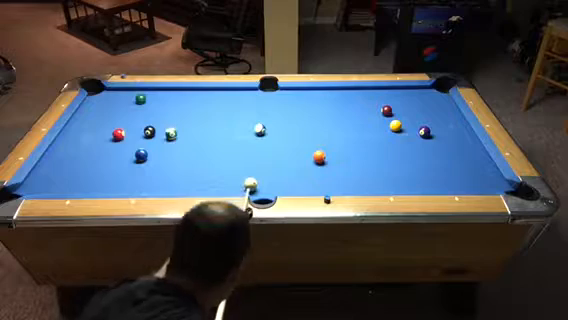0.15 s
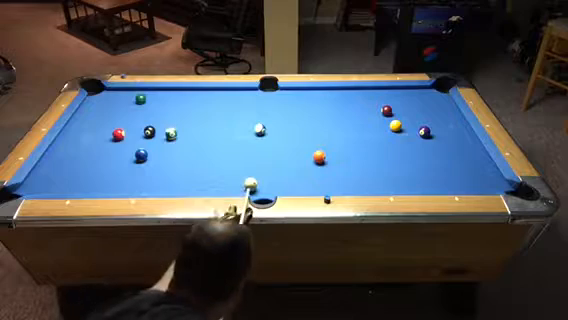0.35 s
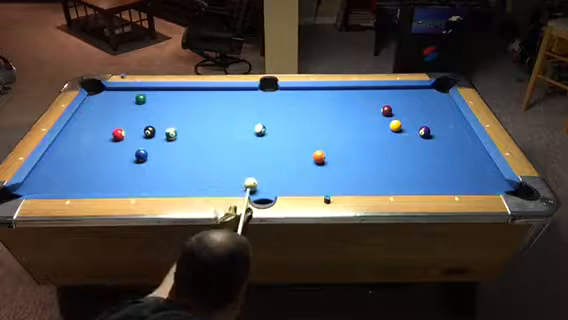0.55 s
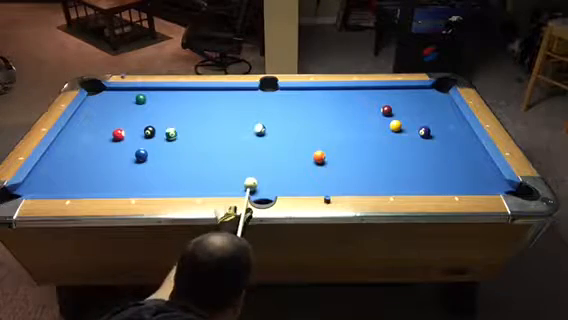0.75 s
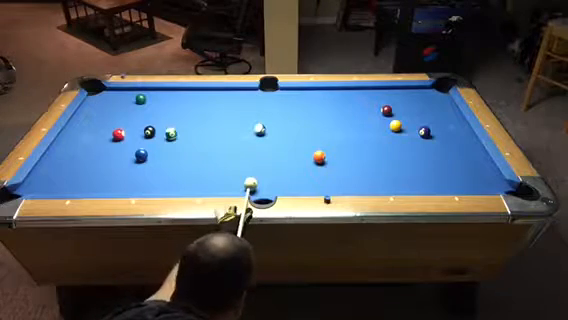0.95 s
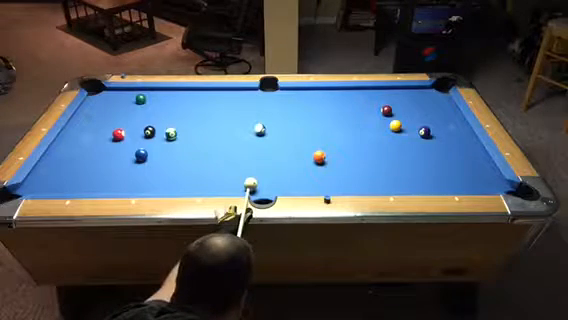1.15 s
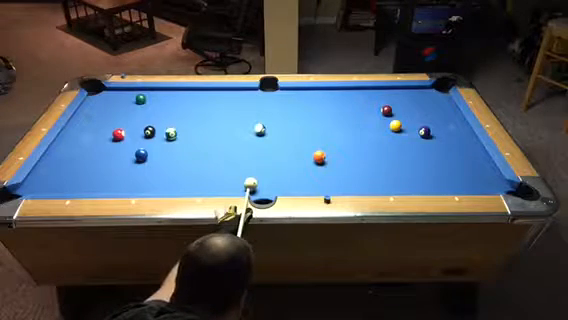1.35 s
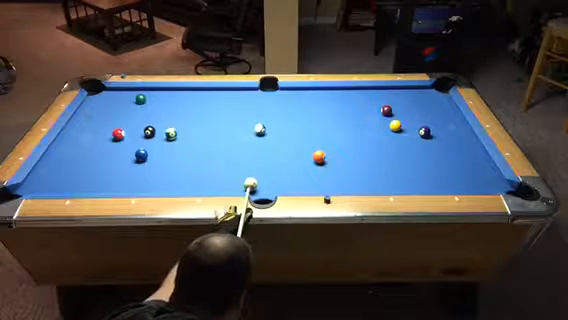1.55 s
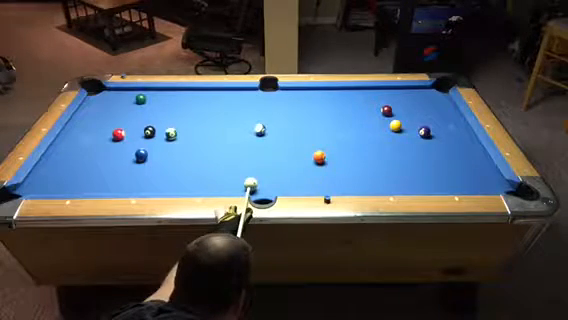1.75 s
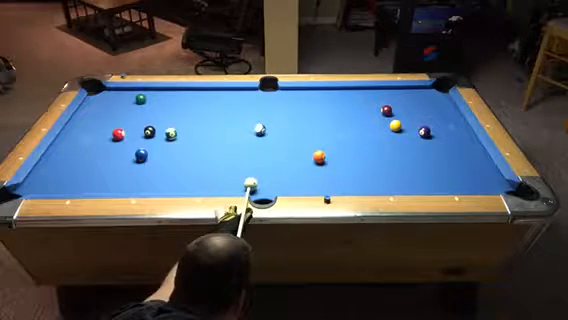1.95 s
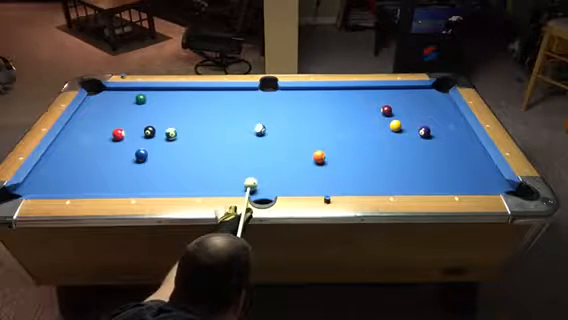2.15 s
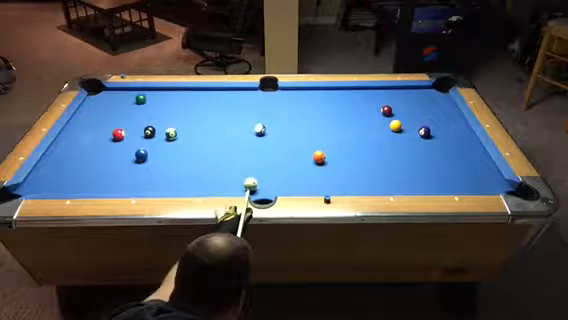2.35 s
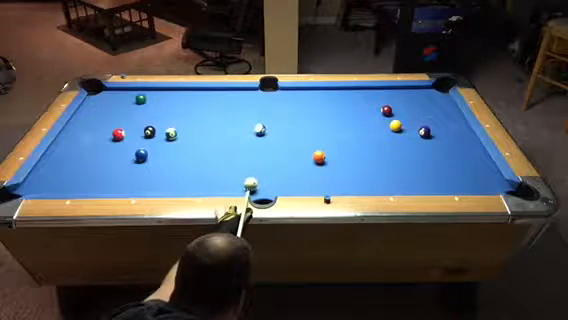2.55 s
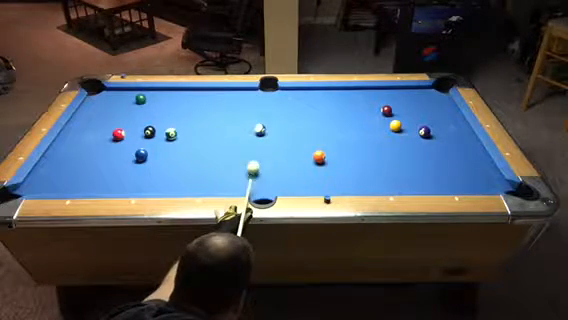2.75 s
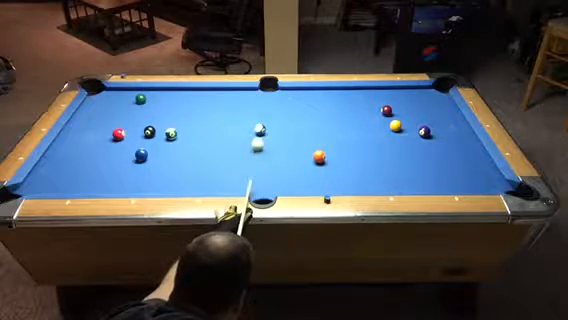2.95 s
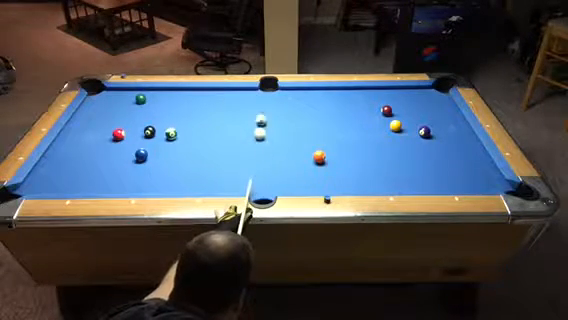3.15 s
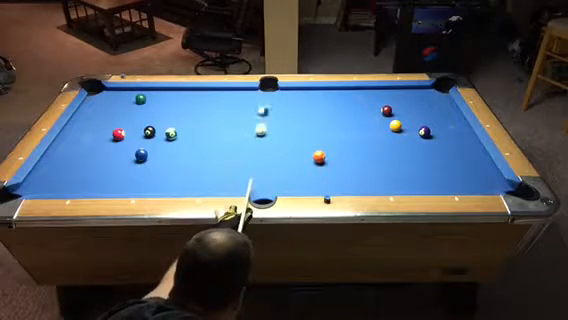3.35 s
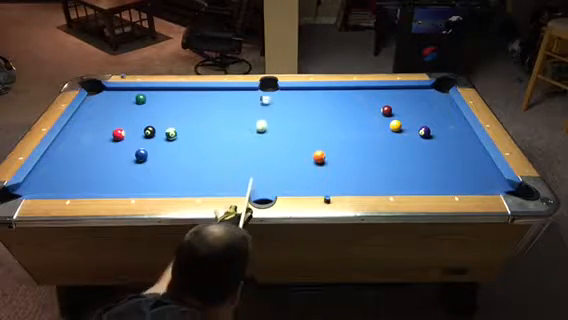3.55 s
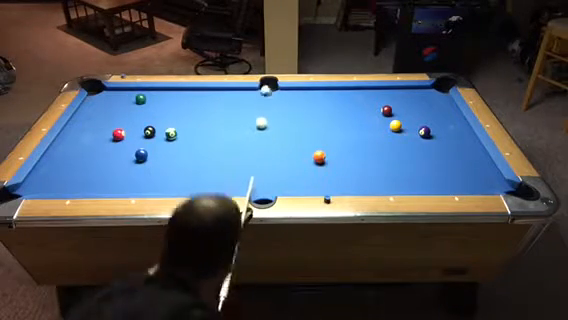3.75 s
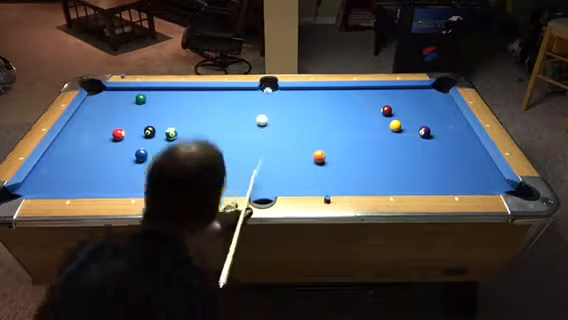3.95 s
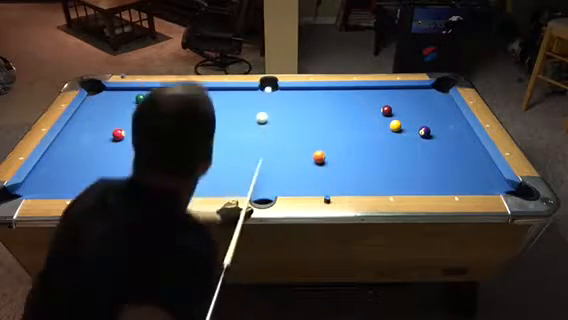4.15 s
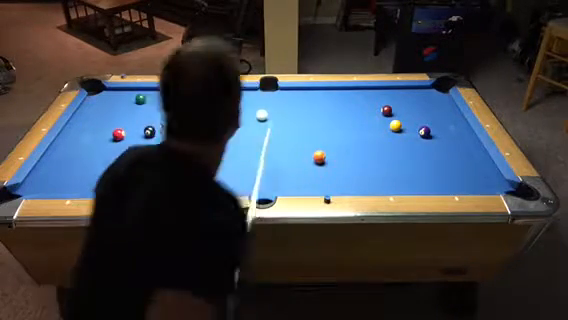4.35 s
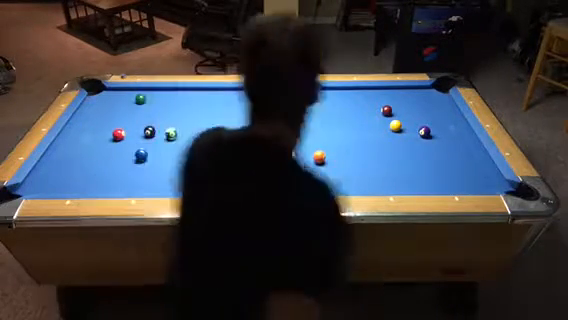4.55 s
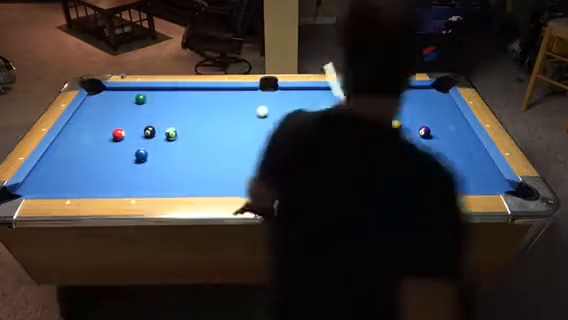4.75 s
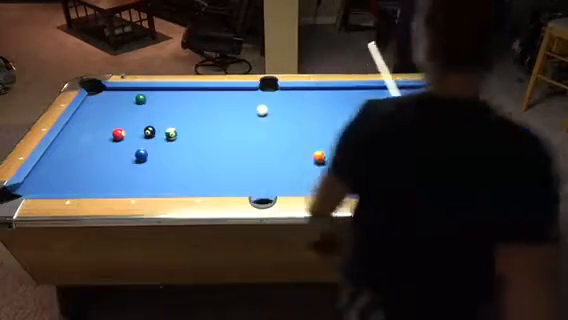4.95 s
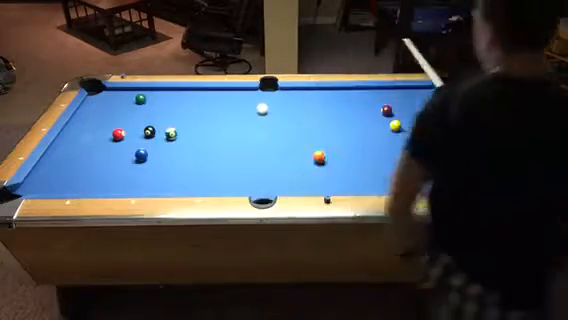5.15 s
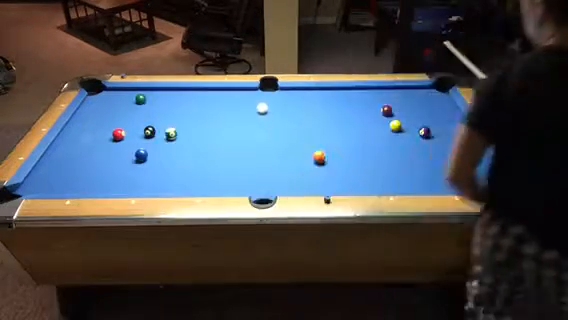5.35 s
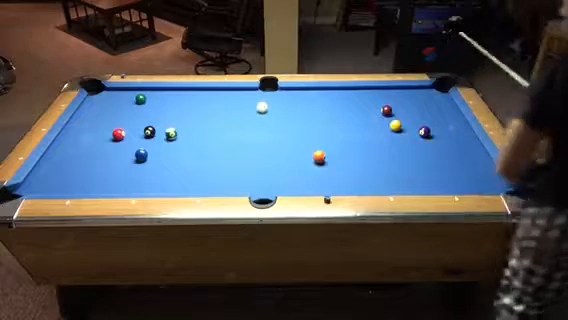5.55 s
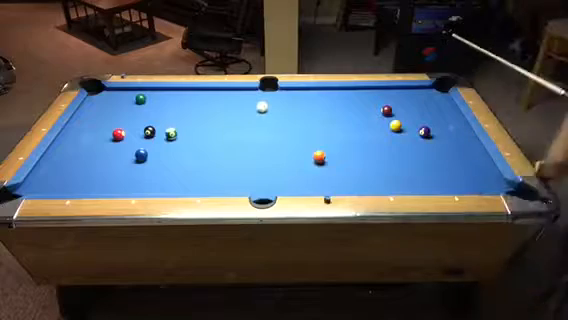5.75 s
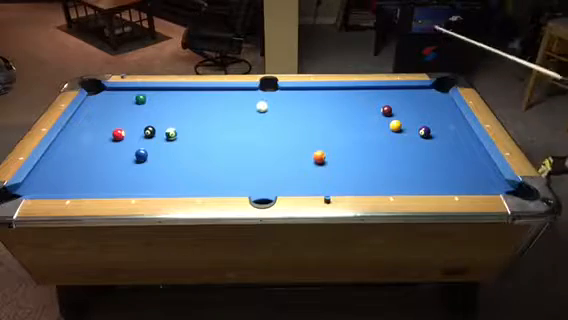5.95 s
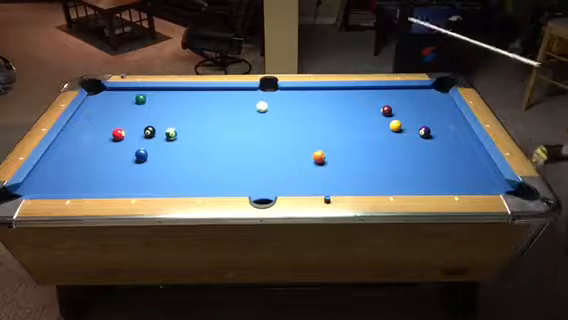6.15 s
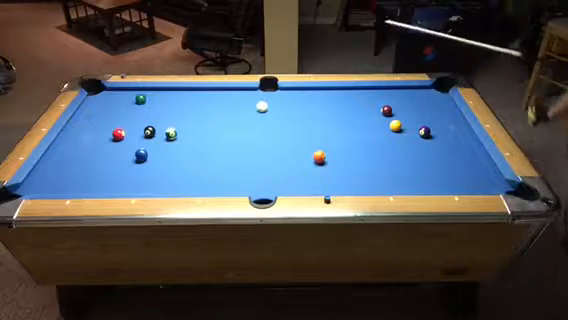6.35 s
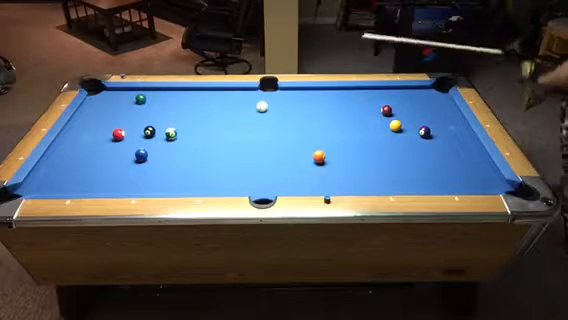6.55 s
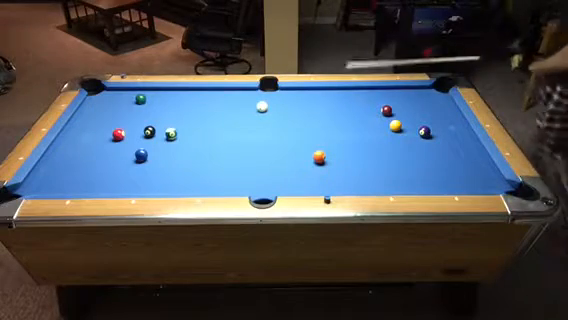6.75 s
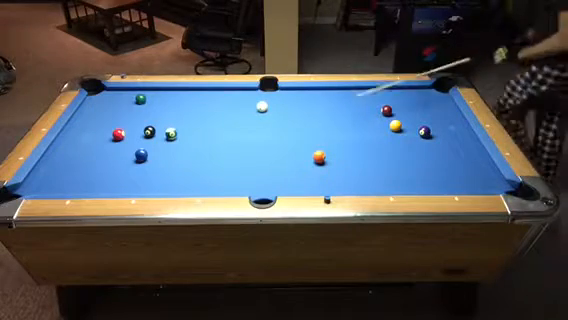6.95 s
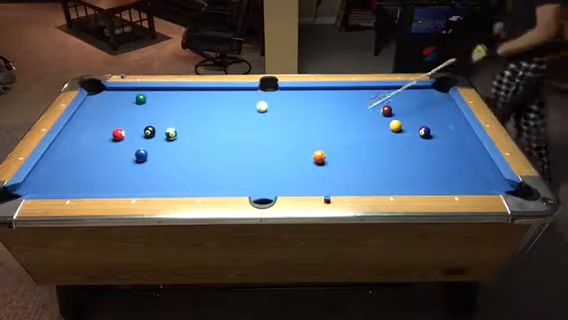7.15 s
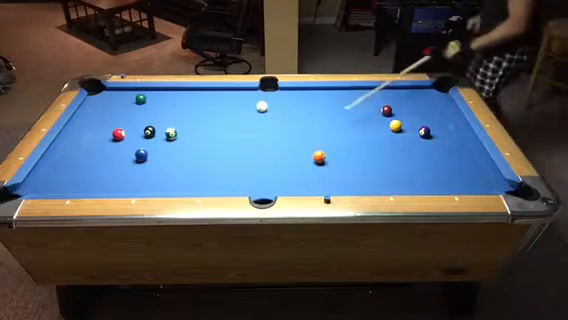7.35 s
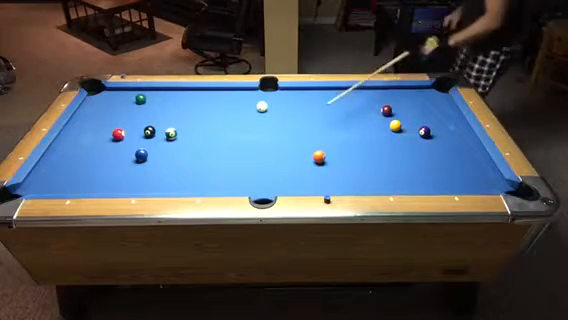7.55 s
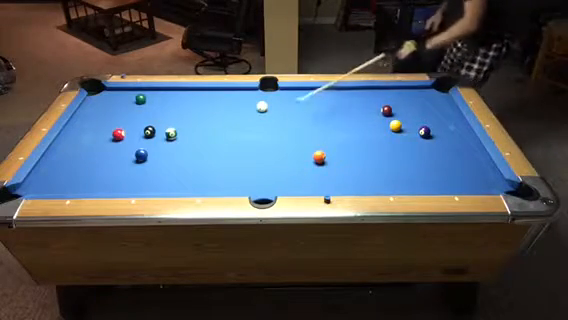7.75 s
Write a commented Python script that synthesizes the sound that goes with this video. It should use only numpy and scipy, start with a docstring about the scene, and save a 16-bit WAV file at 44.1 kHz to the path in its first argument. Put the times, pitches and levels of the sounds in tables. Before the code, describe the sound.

Pool balls click, drop into pockets and knock and rumble down a hollow wooden ball return in a small room.

```python
"""Pool balls click, drop into pockets, then knock and rumble down the table's wooden ball return.
Each blow is a bare contact crack plus a noisy ring that is coloured by the hollow cabinet and dies
fast in a small carpeted basement. Some knocks leave a panel ringing, and the channel hums under the
rolling balls. Behind the table, shoes scuff over faint ventilation hum and hiss."""
import sys
import numpy as np
from scipy import signal
from scipy.fft import rfft, irfft
from scipy.io import wavfile
from scipy.ndimage import uniform_filter1d

SR = 44100
rng = np.random.default_rng(int(sys.argv[2]) if len(sys.argv) > 2 else 0)


def file_out(sig):
    """Save sig as 16-bit WAV at sys.argv[1]."""
    # one column per channel
    cols = np.atleast_2d(sig).T
    # limit, then scale
    lim = np.clip(cols, -1, 1)
    pcm = np.round(lim * 32767).astype(np.int16)
    wavfile.write(sys.argv[1], SR, pcm)


N = 347949

BANDS_HZ = 35 * 2 ** np.arange(0, 9, 1 / 3)  # third-octave centres
# resonances of the hollow cabinet: (pitch [Hz], lift over the wood's broad ring [dB])
CABINET_MODES = [(71, 3), (245, 4.5), (322, 0.5), (357, 4.5), (440, 3), (495, 3), (539, 2), (600, 2),
                 (850, 4.5), (969, 3), (1081, 4), (1272, -1), (1395, 0), (1697, 3), (1780, 0.5), (2145, 3),
                 (2424, -8.5)]
# balls rolling down the return: (time [s], rumble [dB], channel pitch [Hz], channel hum [dB])
ROLL_PATH = [(0, -48, 348.4, -59), (.6, -38, 325.6, -40.5), (.88, -62.5, 238.4, -55.5),
             (1.5, -47.5, 240.7, -62), (1.9, -30, 295, -36), (2.36, -34.5, 289.3, -36.5),
             (2.41, -31, 209.3, -36.5), (2.55, -34.5, 201.7, -34), (2.68, -38, 378, -41),
             (2.97, -54, 300, -57), (3.6, -78, 277, -80.5), (4.0, -56.5, 262.8, -68),
             (4.5, -41.5, 296.5, -54.5), (4.9, -31.5, 240.7, -42), (5.25, -38, 341.6, -54.5),
             (5.85, -37, 362.5, -40), (6.45, -34.5, 301.5, -51), (6.8, -29.5, 301.2, -44),
             (7.05, -79, 258.4, -75), (7.42, -55.5, 249.6, -56.5), (7.47, -58, 344, -55.5),
             (7.89, -45.5, 344.3, -51.5)]


def blows(bands, gain_db=-11, crack_db=16, place_db=6, linger=1.254, early_db=6, early_s=0.0042):
    """Each blow cracks, then wood ring and room echoes gather and die away band by band."""
    # decay of wood and room: (frequency [Hz], nominal ring time [s])
    ring_times = [(50, 0.34), (100, 0.36), (200, 0.3), (400, 0.24), (1000, 0.2), (2500, 0.19), (6000, 0.17),
                  (12000, 0.076)]
    # how fast the echoes gather: (frequency [Hz], rise time [s])
    rise_times = [(60, 0.024), (300, 0.0046), (2000, 0.0043), (10000, 0.0033)]
    # the crack and its returns from slate, floor, ceiling and wall: (delay [s], level [dB])
    echoes = [(.0012, 0), (.002, -4), (.0128, -9), (.0178, -10), (.024, -11)]
    t = np.arange(2 ** 15, dtype=np.float32) / SR
    times, levels, bare_db, stretch = contacts()
    levels = gain_db + levels
    gather = 1 - np.exp(-t / along(rise_times, BANDS_HZ)[:, None])
    gather *= 1 + undb(early_db) * np.exp(-t / early_s)  # the first reflections are the strongest
    # the ball jostles on after the blow, so the fall starts slowly and steepens
    fall = np.log(1000) / 2 * (2 * t / along(ring_times, BANDS_HZ)[:, None]) ** linger
    noise_starts = rng.integers(0, N - len(t), len(times))
    places = place_db * np.tanh(rng.standard_normal((len(times), len(CABINET_MODES))) / 1.5)
    places[:, 0] = 0  # the deepest mode is the whole box and answers anywhere
    scatter = (np.arange(24) + rng.random((len(times), 24))) / 24
    spot_hz = np.interp(scatter, (0, 1), (1100, 5400))  # small modes of each struck spot
    out = np.zeros(N + len(t))
    for k, start in enumerate(noise_starts):
        tail = bands[:, start:start + len(t)] * gather * np.exp(-fall / stretch[k])
        i = int(times[k] * SR)
        out[i:i + len(t)] += cabinet(undb(levels[:, k]) @ tail, places[k], spot_hz[k])
        pulse = undb(crack_db + bare_db[k]) * crack(levels[:, k])
        for delay, db in echoes:
            j = i + int(delay * SR)
            out[j:j + len(pulse)] += undb(db) * pulse
    return out[:N]


def contacts():
    """Time, band levels, crack level and ring stretch of every knock, click and thump."""
    return [np.hstack(column) for column in zip(knocks(), clicks(), thumps())]


def knocks():
    """Balls hit the wood of pocket and return; harder contact is brighter and cracks more."""
    # ball on wood: (time [s], level [dB], relative boom [dB], hardness [dB], ring stretch [x])
    hits = [(0.296, -39.5, -15, -17, 3.7), (0.391, -21, -7, -6, 2.7), (0.475, -19, 1, 1.5, 1.67),
            (0.546, -15, -12.5, -27, 1.49), (1.07, -28.5, 13, 4.5, 1.38), (1.282, -39.5, 11.5, -5, 0.74),
            (1.57, -30, 9.5, -19, 4), (1.664, -14, -20.5, -3, 1.87), (1.714, -18.5, -10, 1, 0.88),
            (1.761, -19.5, -7, -4.5, 1.35), (1.814, -21.5, 4, -0.5, 0.97), (1.858, -21.5, -4.5, -4, 2.86),
            (2.027, -22, -3.5, -0.5, 1.2), (2.086, -25, -6.5, -3.5, 4.2), (2.515, -23, 3, -62, 0.88),
            (2.574, -20.5, -12.5, 7, 1.76), (2.641, -18, -8.5, -7, 1.77), (2.754, -18.5, -6.5, 3.5, 1.45),
            (3.208, -23, -11, 3.5, 2.56), (3.356, -25.5, -44.5, -5, 1.9), (3.872, -35, -14.5, -23, 1.26),
            (4.077, -16, 4, 8, 1.58), (4.227, -19, 1.5, 6, 1.36), (4.31, -22.5, 0, 3.5, 1.8),
            (4.425, -37.5, 9.5, 1, 8.4), (4.663, -17.5, -1, 2, 1.83), (5.278, -15, -3, 3.5, 0.86),
            (5.304, -11.5, -0.5, 2, 1.15), (5.39, -20, 2, 5.5, 1.68), (5.548, -20, -3.5, -1, 1.79),
            (5.675, -24, -4.5, -3, 2.54), (6.498, -19.5, -2, -11, 4.3), (6.529, -21, -18, 4.5, 3.2),
            (6.64, -27.5, -7, -10, 3.7), (7.203, -35.5, 2, -9, 1.42), (7.452, -35.5, -15, -28.5, 0.57)]
    times, db, boom, hardness, stretch = np.transpose(hits)
    centres_hz = [70, 330, 1100, 2500, 6500]  # boom, knock, clack, click, snap
    colour_db = [boom, np.zeros_like(db), -9 + .5 * hardness, -21.5 + .9 * hardness, -37.5 + 2.6 * hardness]
    levels = db + tilt(centres_hz, colour_db, below_db_oct=-19.5, above_db_oct=-24)
    return times, levels, -6.5 + .23 * hardness, stretch


def clicks(below_db_oct=-2.5, above_db_oct=-53.5, floor_db=-58):
    """Cue tip and balls click together: bright up to a pitch, with a steep drop above it."""
    # hard contacts: (time [s], level [dB], pitch [Hz], bare crack [dB], ring stretch [x])
    hits = [(1.758, -36.5, 2820, -6, 0.22), (1.813, -34.5, 3030, -3, 0.21), (1.856, -37.5, 3040, -8, 0.2),
            (1.887, -37.5, 2520, 0, 0.59), (2.573, -33.5, 2600, 14.5, 0.22), (2.58, -43, 12000, -11, 2.3),
            (3.112, -34.5, 2690, -19, 4.2), (3.159, -24, 3050, 15.5, 1.34), (4.075, -33, 4640, 20.5, 0.39),
            (4.229, -37, 4260, 14, 0.31), (4.31, -44.5, 4370, 14.5, 0.44), (6.112, -43.5, 3100, -6, 0.86),
            (6.523, -41.5, 10400, -10, 1.2), (6.499, -29.5, 2580, 9, 2.25), (6.639, -29.5, 2520, -19, 3.32)]
    times, db, hz, bare_db, stretch = np.transpose(hits)
    octaves = np.log2(BANDS_HZ[:, None] / hz)
    body = below_db_oct * np.maximum(-octaves, 0)
    top = np.maximum(above_db_oct * np.maximum(octaves, 0), floor_db + bare_db)  # a crack lifts the floor
    return times, db + body + top, bare_db, stretch


def thumps():
    """Deep thumps shake the box as a whole, with hardly any crack."""
    # low blows: (time [s], level [dB], ring stretch [x])
    hits = [(0.887, -15, 0.98), (0.982, -15, 0.59)]
    times, db, stretch = np.transpose(hits)
    levels = db + tilt([70], [np.zeros_like(db)], below_db_oct=-19.5, above_db_oct=-14.5)
    return times, levels, np.full(len(times), -40), stretch


def crack(band_db, size=256, low_cut_hz=720):
    """The bare contact: a pulse a few cycles long, in the blow's colour but thin in the bass."""
    hz = np.maximum(np.fft.rfftfreq(size, 1 / SR), 50)
    gain = undb(along(np.transpose([BANDS_HZ, band_db]), hz)) / np.sqrt(1 + (low_cut_hz / hz) ** 4)
    cepstrum = irfft(np.log(gain))
    cepstrum[1:size // 2] *= 2  # minimum phase packs the energy at the front
    cepstrum[size // 2 + 1:] = 0
    pulse = irfft(np.exp(rfft(cepstrum)))
    return pulse / np.abs(pulse).max() * undb(band_db[BANDS_HZ > 600].max())


def cabinet(shake, place_db, spot_hz=(), spot_db=8.5, wood_loss=0.005, rail_loss=0.072):
    """Box and rails lift their modes out of whatever shakes them; the place struck favours some."""
    f = np.fft.rfftfreq(len(shake), 1 / SR)[:len(shake) // 8]
    spectrum = rfft(shake)
    # (pitch [Hz], lift [dB], width [Hz])
    box = [(hz, db + place, 8 + wood_loss * hz) for (hz, db), place in zip(CABINET_MODES, place_db)]
    spot = [(hz, spot_db, 30) for hz in spot_hz]
    rails = [(hz, 2.4, rail_loss * hz) for hz in (1300, 2200)]
    for hz, db, width in box + spot + rails:
        resonance = 1j * f * width / (hz ** 2 - f ** 2 + 1j * f * width)
        spectrum[:len(f)] *= 1 + (undb(db) - 1) * resonance
    return irfft(spectrum, len(shake))


def panel_rings(detune=.012, wobble_db=2.5, skirt_db_oct=-37, attack_s=0.0035):
    """Cabinet modes near a knocked panel's pitch swing up and die away, never quite alike twice."""
    # ringing panels of pocket and return: (time [s], level [dB], pitch [Hz], t60 [s])
    panels = [(0.392, -16.5, 315, 0.28), (0.478, -31, 2140, 0.11), (0.545, -25, 443, 0.33),
              (1.069, -37.5, 1990, 0.26), (1.664, -22.5, 1300, 0.13), (1.816, -34, 1120, 0.61),
              (2.64, -20.5, 357, 0.35), (3.163, -20, 1400, 0.08), (3.208, -29.5, 1073, 0.4),
              (3.209, -27, 532, 0.36), (3.359, -27.5, 776, 0.27), (4.078, -8, 893, 0.11),
              (4.08, -20.5, 1700, 0.16), (4.496, -35.5, 1000, 0.32), (5.276, -15.5, 360, 0.39),
              (5.305, -26, 1200, 0.2), (5.395, -16.5, 360, 0.37), (5.676, -27.5, 357, 0.75),
              (6.532, -10.5, 250, 0.22), (6.532, -21, 495, 0.26), (7.205, -36.5, 500, 0.36),
              (7.205, -33.5, 250.6, 0.36)]
    t = np.arange(2 ** 15) / SR
    mode_hz = np.array(CABINET_MODES)[:, :1]
    chance = rng.standard_normal((len(panels), 2, len(mode_hz), 1))
    attack = 1 - np.exp(-t / attack_s)
    out = np.zeros(N + len(t))
    for (time, db, hz, t60), (tune, phase) in zip(panels, chance):
        weights = undb(db + skirt_db_oct * np.abs(np.log2(mode_hz / hz)))
        swing = weights * np.sin(2 * np.pi * (mode_hz * (1 + detune * tune) * t + phase))
        i = int(time * SR)
        out[i:i + len(t)] += swing.sum(axis=0) * attack * undb(-60 * t / t60)
    return out[:N] * undb(wobble_db * waver(110))


def rolling(bands, bump_db=1, flicker_db=3, gain_db=-12, boom_hz=72, rattle_hz=1100, rattle_db=-19):
    """A ball rumbles along the rails: bumps shake all bands at once, and each band also wavers alone."""
    # deep boom under the rolling: (time [s], level [dB])
    boom_path = [(0, -39), (1.0, -42.5), (1.5, -21.5), (1.9, -40), (4.0, -43.5), (4.5, -33.5), (4.9, -45.5),
                 (5.25, -37), (5.85, -35), (6.8, -36.5), (7.05, -55.5), (7.89, -55.5)]
    roll_times, rumble_db, channel_hz, _ = np.transpose(ROLL_PATH)
    times = np.union1d(roll_times, np.array(boom_path)[:, 0])
    rumbles = np.interp(times, roll_times, rumble_db)
    pitches = np.interp(times, roll_times, channel_hz)
    booms = np.interp(times, *np.transpose(boom_path))
    levels = np.hstack([tilt([boom_hz, hz, rattle_hz], [[boom], [db], [db + rattle_db]], -38, -14)
                        for boom, db, hz in zip(booms, rumbles, pitches)])
    t = np.arange(N) / SR
    out = sum(undb(gain_db + np.interp(t, times, db) + flicker_db * waver(12)) * band
              for db, band in zip(levels, bands))
    return out * undb(bump_db * waver(60))


def channel_hum(width_hz=30):
    """The hollow channel under the ball answers in one narrow, wavering note."""
    times, _, hz, db = np.transpose(ROLL_PATH)
    t = np.arange(N) / SR
    phase = 2 * np.pi * np.cumsum(np.interp(t, times, hz)) / SR
    note = (0.87 + waver(width_hz)) * np.sin(phase) + waver(width_hz) * np.cos(phase)
    return undb(np.interp(t, times, db)) * note


def scuffs(bands, gain_db=-12.5, grain_db=3.5, spread_oct=0.74):
    """Shoes, cloth and jostling balls rub in short, grainy swells of broad noise."""
    # rubs: (time [s], level [dB], length [s], centre [Hz])
    rubs = [(2.509, -51, 0.19, 1705), (3.217, -66, 0.008, 6500), (3.37, -59, 0.0093, 6100),
            (5.816, -54, 0.06, 3780), (6.294, -56, 0.052, 2940), (7.206, -58.5, 0.098, 4000),
            (7.365, -57.5, 0.039, 4230), (7.647, -53, 0.053, 3526), (7.797, -54, 0.037, 3327)]
    t = np.arange(N) / SR
    out = np.zeros(N)
    for time, db, length, hz in rubs:
        near = slice(int((time - .15) * SR), min(int((time + .15) * SR), N))
        colour = np.exp(-.5 * (np.log2(BANDS_HZ / hz) / spread_oct) ** 2)
        swell = np.exp(-.5 * ((t[near] - time) / (.5 * length)) ** 2)
        out[near] += undb(db + gain_db) * swell * (colour @ bands[:, near])
    return out * undb(grain_db * waver(300))


def room_tone(bands, level_db=-60.5, drift_db=0.4):
    """Ventilation hum and microphone hiss make a faint, gently drifting bed."""
    # colour of the bed: (frequency [Hz], relative density [dB])
    density = [(18, -38), (30, 1.5), (59, -5), (86, 7.5), (149, -11), (355, -26), (415, -34), (1390, -24.5),
               (6380, -29), (14800, -41.5), (16000, -54)]
    band_db = along(density, BANDS_HZ) + 10 * np.log10(BANDS_HZ)  # wider bands hold more power
    out = undb(band_db) @ bands * undb(drift_db * waver(2.3))
    return out / out.std() * undb(level_db)


def noise_bands():
    """Independent noise in each third-octave band, rms 1."""
    bands = []
    for hz in BANDS_HZ:
        sos = signal.butter(3, [hz * 2 ** (-1 / 6), hz * 2 ** (1 / 6)], "bandpass", fs=SR, output="sos")
        band = signal.sosfilt(sos, rng.standard_normal(N))
        bands.append(band / band.std())
    return np.float32(bands)


def waver(rate_hz):
    """Random steps, smoothed twice; spread near 1."""
    hold = int(SR / rate_hz)
    steps = np.repeat(rng.standard_normal(N // hold + 1), hold)
    return 1.3 * uniform_filter1d(uniform_filter1d(steps, hold), hold)[:N]


def tilt(centres_hz, db, below_db_oct, above_db_oct):
    """Band levels through a few centres, falling away outside them."""
    octave, centres = np.log2(BANDS_HZ), np.log2(centres_hz)
    inside = np.array([np.interp(octave, centres, column) for column in np.transpose(db)])
    below = below_db_oct * np.maximum(centres[0] - octave, 0)
    above = above_db_oct * np.maximum(octave - centres[-1], 0)
    return (inside + below + above).T


def along(table, hz):
    """Read (frequency [Hz], value) rows on a log-frequency axis."""
    f, values = np.transpose(table)
    return np.interp(np.log(hz), np.log(f), values)


def undb(db):
    """Decibels to amplitude."""
    return 10 ** (np.asarray(db) / 20)


def scene():
    """Blows and ringing panels up front, rolling beneath, scuffs and room tone behind; mono."""
    bands = noise_bands()
    push_db = np.full(len(CABINET_MODES), 4.5)  # a steady push lets the modes build up
    rumble = cabinet(rolling(bands[:, ::-1]), push_db)
    table = blows(bands) + panel_rings() + rumble + channel_hum()
    return (table + scuffs(bands) + room_tone(np.roll(bands, N // 2, axis=1)))[None]


def record(dry, low_cut_hz=45, top_hz=16300):
    """The microphone loses the deepest bass and rounds the loudest peaks; a steep filter cuts the top."""
    low_cut = signal.butter(4, low_cut_hz, "highpass", fs=SR, output="sos")
    top_cut = signal.ellip(8, .2, 70, top_hz, fs=SR, output="sos")
    rounded = np.tanh(signal.sosfilt(low_cut, dry))
    return signal.sosfilt(top_cut, rounded)


dry = scene()
out = record(dry)
file_out(out)
```